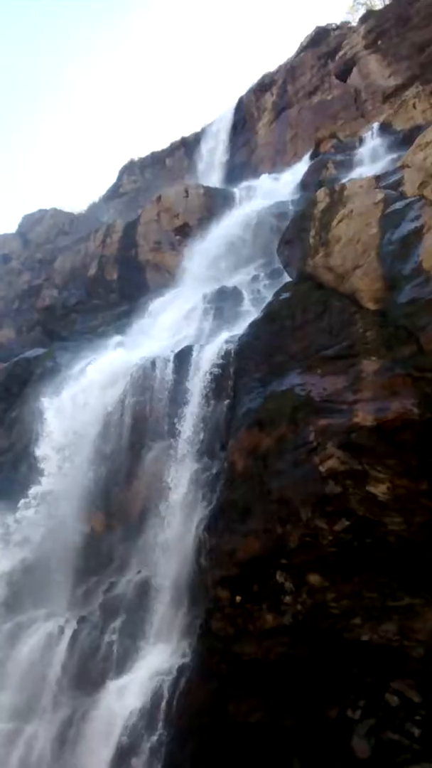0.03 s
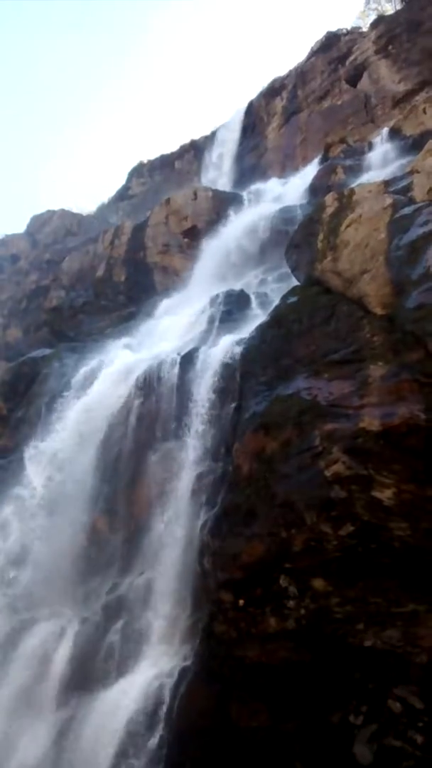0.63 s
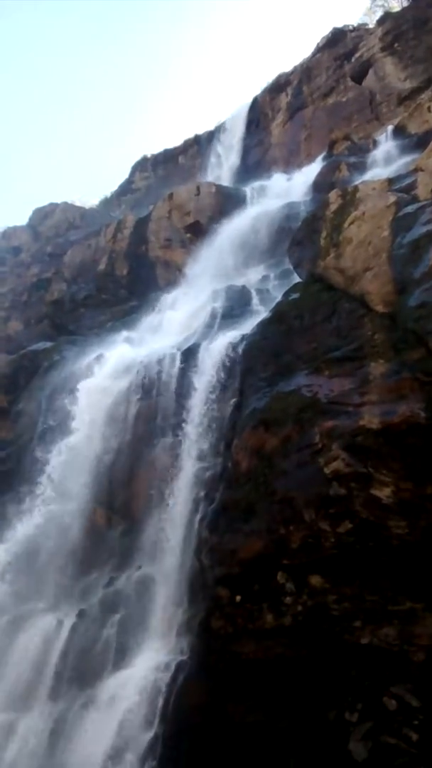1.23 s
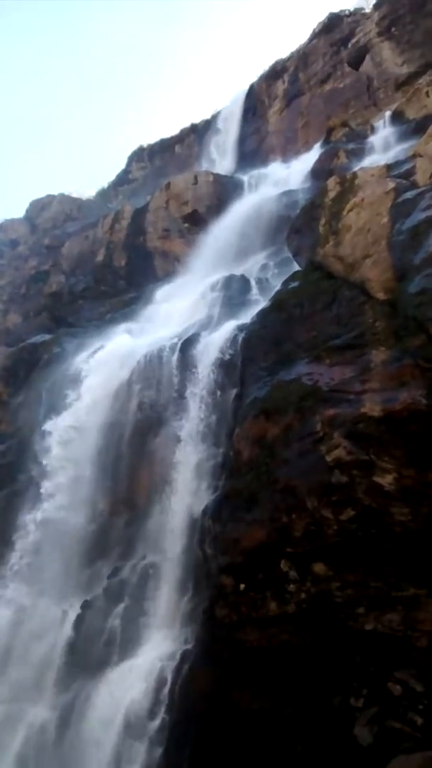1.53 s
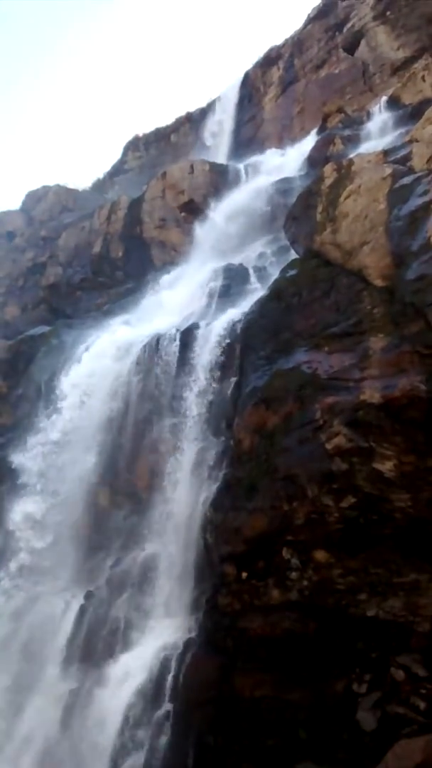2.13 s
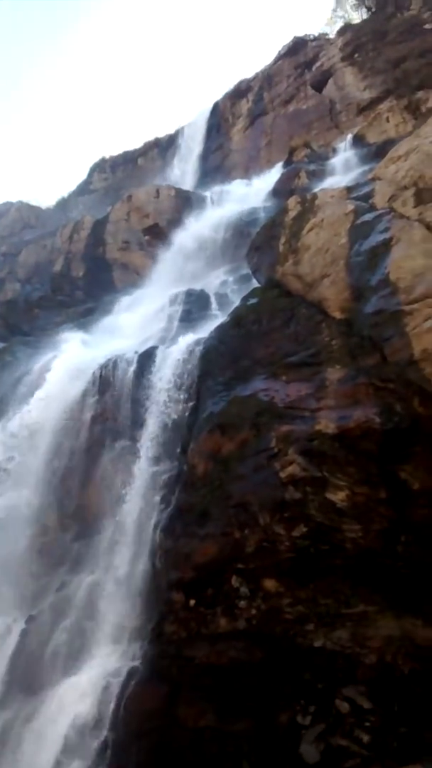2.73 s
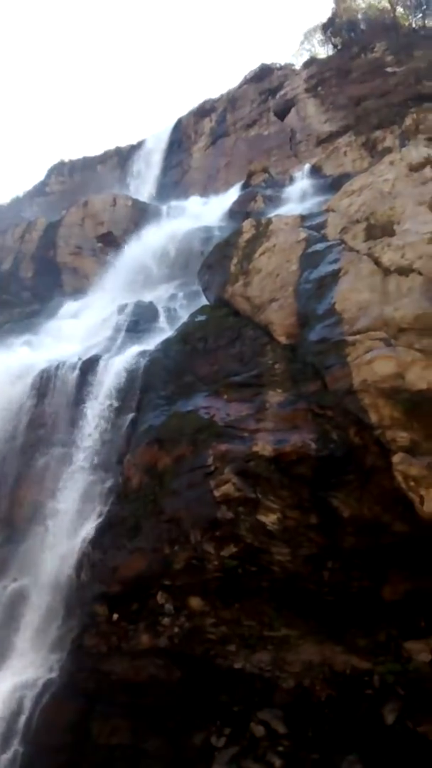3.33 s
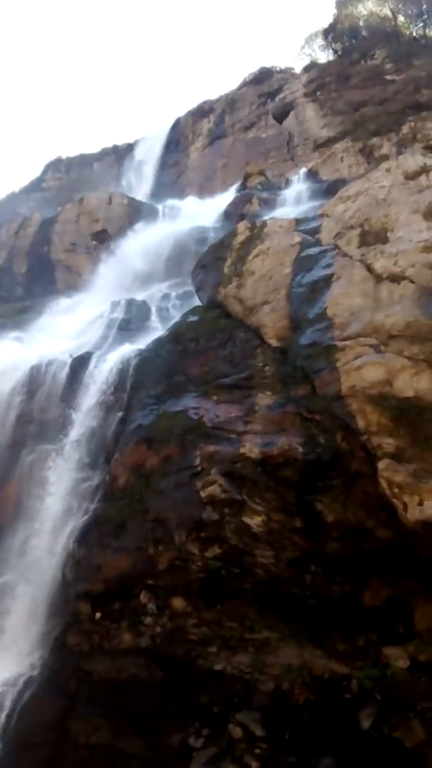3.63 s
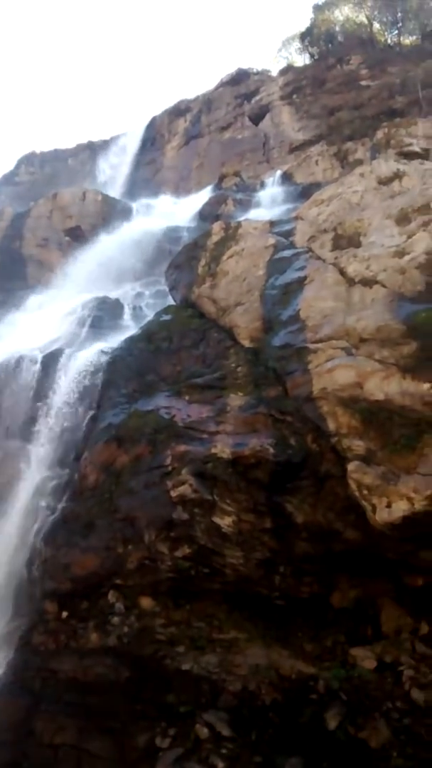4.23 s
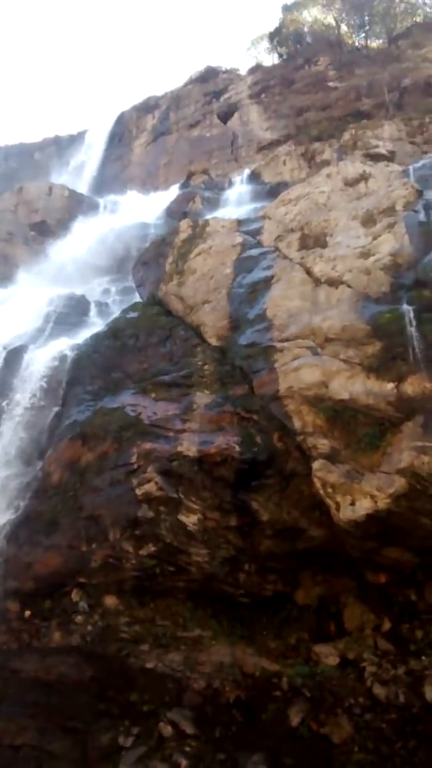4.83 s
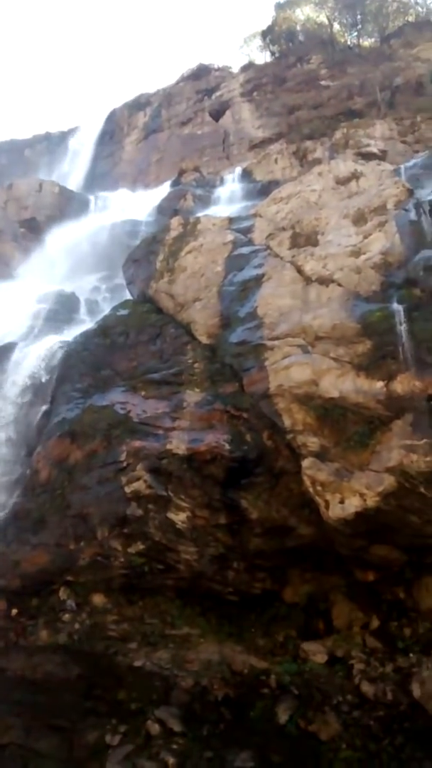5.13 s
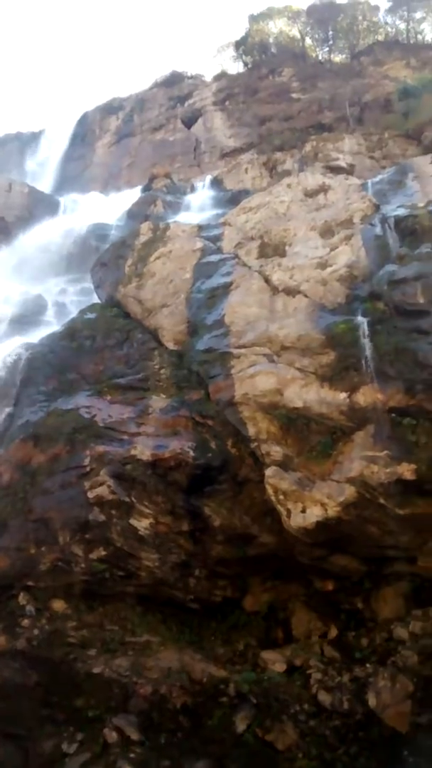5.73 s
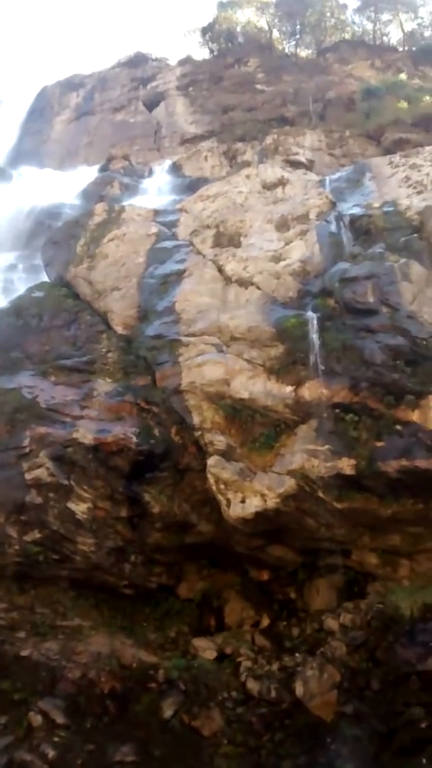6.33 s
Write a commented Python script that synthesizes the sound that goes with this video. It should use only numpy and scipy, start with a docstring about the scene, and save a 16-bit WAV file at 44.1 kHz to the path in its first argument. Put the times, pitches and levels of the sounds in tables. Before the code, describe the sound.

Heard on a hand-held phone at the foot of a cliff, falling water rushes without a break, its low roar swelling slightly under a hiss of spray and tiny splashes. Wind on the microphone starts as a faint rumble with a few soft knocks, then turns to heavy, irregular buffeting near the end, making the waterfall dip a little after the hardest hits.

```python
"""At the foot of a waterfall

A tall waterfall roars down a cliff, heard on a hand-held phone with two microphone ports (openings).
Clumps of water thud on the rock under a hiss of spray and a fine patter of drops.
The fall drives a draught whose eddies (swirls of air) rumble and thump against the ports.
The hardest thumps make the phone's limiter turn everything down, so the water dips too."""
import sys
import numpy as np
from scipy import signal
from scipy.fft import rfft, irfft
from scipy.io import wavfile
from scipy.ndimage import uniform_filter1d, minimum_filter1d, map_coordinates

SR = 44100
rng = np.random.default_rng(int(sys.argv[2]) if len(sys.argv) > 2 else 0)


def dump(signal):
    """Clip the signal to [-1, 1] and save it as 16-bit WAV at the path in sys.argv[1]."""
    limited = np.clip(np.atleast_2d(signal).T, -1, 1)
    pcm = np.round(limited * 32767).astype(np.int16)
    wavfile.write(sys.argv[1], SR, pcm)


N = 280917
T = np.arange(N) / SR
HZ = np.fft.rfftfreq(N, 1 / SR)

# The tone of the falling water at the left port: frequency_hz, relative_level_db
WATER_TONE = [(30, -12.5), (70, -9), (115, -5.5), (165, -6.3), (230, -1), (310, 1.5), (390, -0.16),
              (480, 0.4), (750, -4), (1100, -7.5), (1700, -10.5), (2000, -11), (2400, -12.5), (3000, -12.5),
              (3700, -13.5), (4750, -14.5), (5300, -14), (7000, -18), (10000, -25), (15000, -33)]
# The slow swell of the low roar on the rock: time_s, level_db
ROAR_SWELL = [(0.3, 0.7), (0.47, -2), (0.65, 2.5), (0.8, -1.7), (0.93, 2.2), (1.2, 1.1), (1.44, 3),
              (1.62, -0.5), (1.78, 1), (1.95, 0.2), (2.6, 0.6), (3.3, 0), (3.46, 1.5), (3.65, -0.9),
              (3.92, 0.5), (4.15, 0.2), (4.45, -0.5), (4.74, 1.3), (4.85, 0), (4.98, 0.4), (5.15, -1.4),
              (5.6, 0.9), (5.95, 1.2), (6.15, 0), (6.3, 2.5)]
# The tone as the phone turns from the main fall to the rock beside it: time_s, middle_db, treble_db
TURN_TONE = [(0.6, -0.2, -1.5), (1.3, -0.3, 0.7), (2.8, 0.3, -0.5), (3.2, 0.9, 1), (3.9, 1.7, 0.5),
             (4.2, -0.5, -0.5), (4.9, 1.2, 0), (5.8, 0.7, 0.5), (6.3, 1, 1.5)]
# The right port compared with the left: frequency_hz, level_db, likeness_0_to_1, phase_lag_rad
RIGHT_PORT = [(100, -1, 0.9, -0.2), (350, -4.3, 0.79, -0.28), (600, -1.7, 0.88, -0.44),
              (1000, -0.5, 0.96, -0.21), (1300, -0.0, 0.99, -0.0), (1500, 0.1, 0.94, 0.09),
              (1750, -1.5, 0.71, 0.64), (2000, -1.6, 0.62, 1.55), (2250, -1.7, 0.78, 2.57),
              (2430, -0.5, 0.95, 3.02), (2490, -0.1, 0.995, 3.11), (2580, 0, 0.995, 3.18),
              (2670, 0, 0.9, 3.38), (2850, 1.1, 0.77, 3.93), (3100, 1.3, 0.8, 4.65),
              (3450, 0.2, 0.87, 5.86), (3700, 0.0, 1.0, 6.29), (4150, 0.2, 0.78, 7.78),
              (4500, -0.9, 0.85, 8.89), (4660, -0.8, 0.965, 9.35), (4760, -1, 0.965, 9.5),
              (5050, -4.2, 0.78, 10.34), (5400, -6.2, 0.81, 11.48), (6300, -9.2, 0.51, 13.37),
              (7000, -11.3, 0.1, 14.7), (8100, -17.1, 0.24, 16.7), (9500, -9, 0.28, 19.2),
              (11200, -7.2, 0.19, 24.3), (13000, -11.9, 0.14, 27.6), (15000, -11.2, 0.08, 30.6)]
# The tone of the draught's rumble: frequency_hz, relative_level_db
RUMBLE_TONE = [(10, 0), (25, -8), (45, -2), (85, 0.5), (140, -0.5), (200, -7), (300, -22), (450, -20.5),
               (900, -37), (3000, -80)]
# Gusts that swell and fade on top of the breeze: peak_time_s, level_db, half_length_s
AIR_GUSTS = [(0.44, -29, 0.16), (0.86, -32, 0.065), (1.4, -35, .15), (2.284, -32, 0.038),
             (2.782, -31, 0.17), (3.18, -28, 0.12), (4.26, -23, 0.063), (4.5, -30, 0.088), (5.0, -26, 0.2),
             (5.194, -18, 0.063), (5.436, -18.5, .08), (5.635, -18, 0.037), (5.75, -19.5, 0.021),
             (5.977, -12, 0.055), (6.254, -20, 0.07)]
# The hardest eddies to hit the ports: time_s, peak_db, pitch_hz, left_minus_right_db, rebound_0_to_1
HARD_EDDIES = [(1.179, -14.5, 150, 3, 0.9), (1.932, -16, 120, 3, 0.8), (2.070, -15.5, 100, -4, 0.9),
               (2.766, -14.5, 120, -4, 0.8), (3.137, -13, 110, -4, 0.7), (3.165, -15, 90, -3, 0.6),
               (3.195, -16.5, 90, -8, 0.9), (4.203, -15, 130, 0, 0.9), (4.244, -1.3, 95, 2.5, 0.98),
               (4.306, -1.5, 225, 4.5, 1), (5.052, -12, 110, 3, 0.8), (5.144, -9, 100, 2, 0.9),
               (5.170, -9.5, 90, -4.5, 1), (5.203, -9, 180, -5.5, 0.9), (5.229, -5.5, 120, -4.5, 0.6),
               (5.239, -2, 135, -3, 0.8), (5.310, -1, 235, -7.5, 0.74), (5.392, -8, 100, 5, .8),
               (5.429, -4.5, 170, 6.5, 0.76), (5.441, -8, 120, 4, 1), (5.500, -7.5, 220, 7.5, .5),
               (5.533, -9, 100, 3.5, 1), (5.634, -5, 105, 1, .9), (5.910, -16, 150, -2, 0.8),
               (5.919, -11, 100, -6, 1), (5.93, -13, 81, -7, 1), (5.955, -14, 70, -3, 1),
               (5.971, -15.5, 110, -0.5, .9), (5.980, -16, 330, -6, 1), (5.987, -0.5, 230, -7.5, 0.24),
               (5.998, -7, 150, -1, 1), (6.031, -5, 130, 1.5, 1), (6.217, -5, 105, 2.5, 1),
               (6.297, -9, 150, 4, 1)]


def gain_of(db):
    """Turns decibels into a number to multiply a sound by."""
    return 10 ** (np.asarray(db) / 20)


def unit_level(x):
    """Scales a signal so that its average size (rms) is 1."""
    return x / np.sqrt(np.mean(x ** 2) + 1e-20)


def spectrum(table, column=1):
    """A table column at every frequency, joined by straight lines on a log frequency scale."""
    columns = np.transpose(table)
    return np.interp(np.log(HZ + 1), np.log(columns[0] + 1), columns[column])


def colour(x, gain):
    """Filters a sound with one gain for each frequency; a complex gain also shifts the phase."""
    return irfft(rfft(x) * gain, N)


def wander(rate_hz, count=N, step_s=1 / SR):
    """A smooth random curve of average size 1 that moves up to about rate_hz times a second."""
    hz = np.fft.rfftfreq(count, step_s)
    noise = rfft(rng.standard_normal(count))
    return unit_level(irfft(noise * hz / (hz + 2) / (1 + (hz / rate_hz) ** 2), count))


def rush(surge_db=-0.1, surge_hz=12, flicker_db=0.34, flicker_hz=34, patchy_db=1.13,
         hiss_share=0.56, split_hz=1800, swell_hz=950):
    """Countless impacts blend into two separate streams of noise that surge as clumps of water land."""
    window, hop = 512, 128  # the noise is built in short overlapping frames
    frames, step_s = N // hop + 5, hop / SR
    t, hz = np.arange(frames)[:, None] * step_s, np.fft.rfftfreq(window, 1 / SR)
    shape = (2, frames, len(hz))
    noise = rng.standard_normal(shape) + 1j * rng.standard_normal(shape)
    swell = np.interp(t, *np.transpose(ROAR_SWELL)) / (1 + (hz / swell_hz) ** 2)
    surge = surge_db * wander(surge_hz, frames, step_s)[:, None]
    flicker = flicker_db * wander(flicker_hz, frames, step_s)[:, None]
    # each splash lifts its own band of frequencies for a moment
    splashes = uniform_filter1d(rng.standard_normal(shape[1:]), size=16, axis=0)
    splashes = patchy_db * unit_level(uniform_filter1d(splashes, size=8, axis=1))
    clumps = surge + flicker + splashes
    clumps -= uniform_filter1d(clumps, size=80, axis=0)  # the flow is steady: a clump leaves a gap
    roar = 1 / (1 + (hz / split_hz) ** 2)  # heavy clumps sound low, fine spray high
    clump_depth = roar + hiss_share * (1 - roar)
    noise *= gain_of(swell + phone_turn(t, hz) + clump_depth * clumps)
    _, streams = signal.istft(noise.swapaxes(1, 2), nperseg=window, noverlap=window - hop)
    return unit_level(streams[:, :N])


def phone_turn(t, hz, middle_hz=1150, treble_hz=8000):
    """How the tone of the water changes, in dB, as the ports face another way."""
    times, middle_db, treble_db = np.transpose(TURN_TONE)
    middle = np.exp(-2 * np.log2((hz + 1) / middle_hz) ** 2)
    treble = 1 / (1 + (treble_hz / (hz + 1)) ** 6)
    return middle * np.interp(t, times, middle_db) + treble * np.interp(t, times, treble_db)


def patter(drops_per_s=450, spread_db=3, decay_s=0.0039, low_cut_hz=1800):
    """Nearer drops burst on wet rock, each a sharp tick of fizz that dies within milliseconds."""
    sizes = gain_of(spread_db * np.minimum(rng.exponential(1, N), 4))
    drops = sizes * (rng.random(N) < drops_per_s / SR)
    power = signal.lfilter([1], [1, -np.exp(-2 / (decay_s * SR))], drops ** 2)
    fizz = np.sqrt(power) * rng.standard_normal((2, N))
    return unit_level(colour(fizz, HZ / np.hypot(HZ, low_cut_hz)))


def hand_sway(x, lag_s=4e-6, sway_hz=5):
    """The hand turns the phone a little, so the delay at the far port wavers."""
    positions = np.arange(N) + lag_s * SR * wander(sway_hz)
    return map_coordinates(x, [positions], order=5, mode="mirror")


def waterfall(level_db=-22, patter_db=-8.5):
    """The water's sound reaches the left port first; the phone's body shades the treble on the right."""
    direct, scattered = rush() + gain_of(patter_db) * patter()
    tone = gain_of(spectrum(WATER_TONE))
    # how alike the water's hiss sounds at the two ports, at each frequency
    likeness = np.clip(spectrum(RIGHT_PORT, column=2), 0, 1)
    shade = gain_of(spectrum(RIGHT_PORT)) * np.exp(-1j * spectrum(RIGHT_PORT, column=3))
    left = colour(direct, tone)
    right = colour(direct, tone * shade * likeness)
    right += colour(scattered, tone * shade * np.sqrt(1 - likeness ** 2))
    return gain_of(level_db) * np.array([left, hand_sway(right)]) / np.std(left)


def airflow(breeze_db=-37, sway_db=2.5, sway_hz=3.6):
    """The strength of the moving air in dB: a wavering breeze plus gusts that rise and fall."""
    power = gain_of(breeze_db + sway_db * wander(sway_hz)) ** 2
    for peak_time_s, level_db, half_length_s in AIR_GUSTS:
        bell_curve = np.exp(-((T - peak_time_s) / half_length_s) ** 2 / 2)
        power += (gain_of(level_db) * bell_curve) ** 2
    return 10 * np.log10(power)


def draught(trim_db=-0.5, lumpy_db=2, lump_hz=25, calm_hz=130, strong_db=-22, eddy_db=11,
            push_limit=0.33, shared_db=-11):
    """Churning air pushes one port while it pulls the other; stronger air rumbles higher."""
    strong = unit_level(colour(rng.standard_normal((2, N)), gain_of(spectrum(RUMBLE_TONE))))
    calm = unit_level(colour(strong, 1 / (1 + (HZ / calm_hz) ** 2)))
    air_db = airflow()
    force = np.minimum(gain_of(air_db - strong_db), 1)
    lumps = unit_level(gain_of(lumpy_db * wander(lump_hz)))
    rumble = (force * strong + (1 - force) * calm) * lumps
    eddies = force * gain_of(eddy_db) * small_eddies()
    pressure = (rumble + eddies) * gain_of(air_db + trim_db)
    opposed, shared = push_limit * np.tanh(pressure / push_limit)  # small eddies can only push so hard
    return np.array([opposed, -opposed]) + gain_of(shared_db) * shared


def eddy_swing(t, pitch_hz, rebound=1):
    """One passing eddy pulls before t = 0, then pushes back; a weaker push is also slower."""
    share = np.where(t > 0, np.clip(rebound, 0.1, 1), 1)
    phase = 2 * np.pi * pitch_hz * t * share
    return share * phase * np.exp((1 - phase ** 2) / 2)


def small_eddies(per_s=14, pitch_hz=150):
    """Small eddies arrive at random times, each with a random strength and direction."""
    strengths = 2 * rng.random((2, N)) - 1
    arrivals = strengths * (rng.random((2, N)) < per_s / SR)
    return signal.fftconvolve(arrivals, eddy_swing(T - T.mean(), pitch_hz)[None], "same", axes=1)


def hard_eddies(rumble, sweep_s=0.0076):
    """Each hard eddy sweeps the rumble aside and thumps once, in opposite directions at the two ports."""
    rumble_gain, thumps = np.ones(N), np.zeros((2, N))
    for time_s, peak_db, pitch_hz, pan_db, rebound in HARD_EDDIES:
        rumble_gain *= 1 - np.exp(-((T - time_s) / sweep_s) ** 2)
        port_gains = [gain_of(pan_db / 2), -gain_of(-pan_db / 2)]
        thumps += np.outer(port_gains, gain_of(peak_db) * eddy_swing(T - time_s, pitch_hz, rebound))
    return rumble_gain * rumble + thumps


def limiter(x, ceiling_db=-1.8, hold_s=0.079, recovery_db_per_s=7.0):
    """Peaks over the ceiling pull the volume down at once; it waits a moment, then creeps back up."""
    peak_db = 20 * np.log10(abs(x).max(0) + 1e-9)
    over_db = np.maximum(peak_db - ceiling_db, 0)
    half_hold = round(hold_s * SR / 2)
    held_db = -minimum_filter1d(-over_db, 2 * half_hold + 1, origin=half_hold)  # biggest recent excess
    creep_db = recovery_db_per_s * T
    cut_db = np.maximum.accumulate(held_db + creep_db) - creep_db
    return x / gain_of(uniform_filter1d(cut_db, size=60))


def scene():
    """Falling water and moving air at the two ports."""
    return waterfall() + hard_eddies(draught())


def record(dry, start_s=0.078, first_gain=0.056, fade_s=0.14, high_cut_hz=15300):
    """The phone switches on and fades in, limits the peaks and cuts the highest treble."""
    fade_in = (T > start_s) * np.clip(first_gain + (T - start_s) / fade_s, 0, 1)
    limited = limiter(dry * fade_in)
    low_pass = signal.firwin(511, high_cut_hz, window=("kaiser", 9), fs=SR)
    return signal.oaconvolve(limited, low_pass[None], "same", axes=1)


dry = scene()
out = record(dry)
dump(out)
```